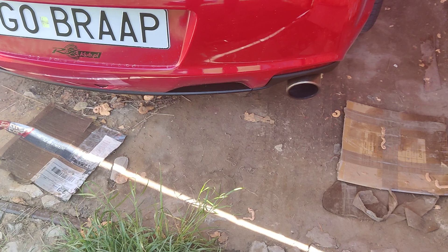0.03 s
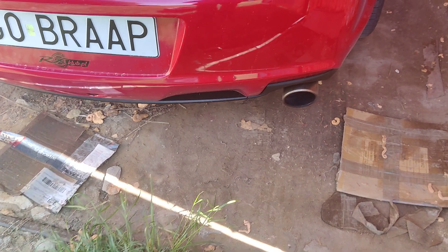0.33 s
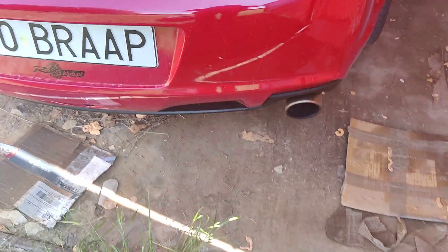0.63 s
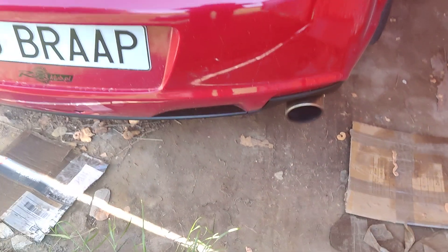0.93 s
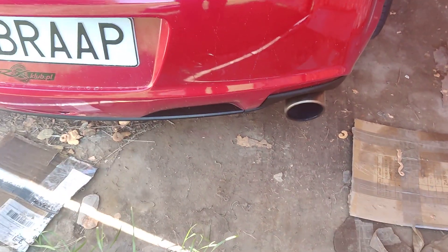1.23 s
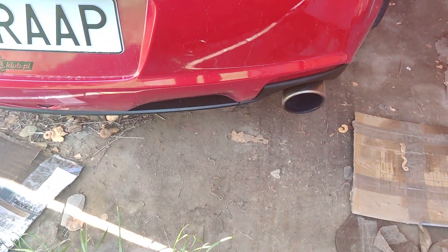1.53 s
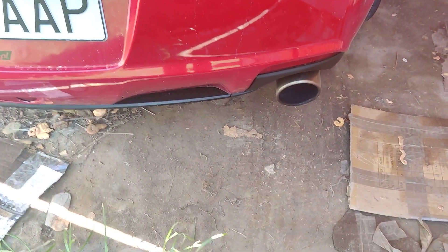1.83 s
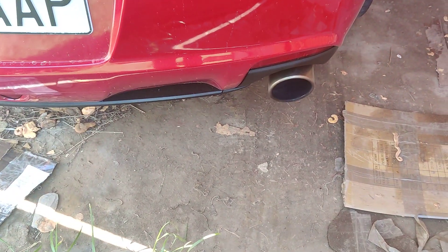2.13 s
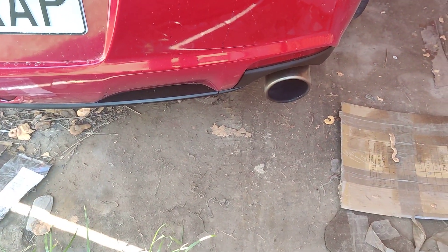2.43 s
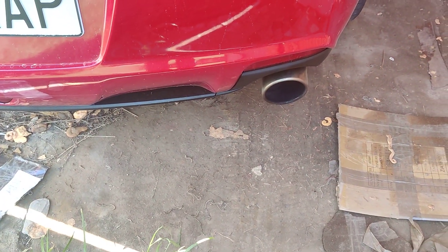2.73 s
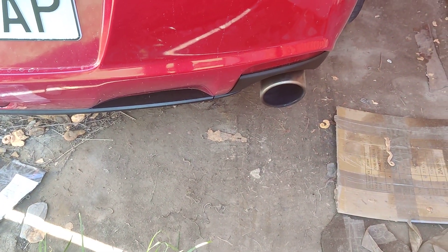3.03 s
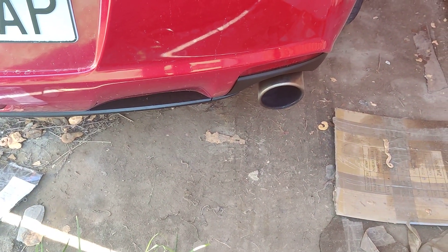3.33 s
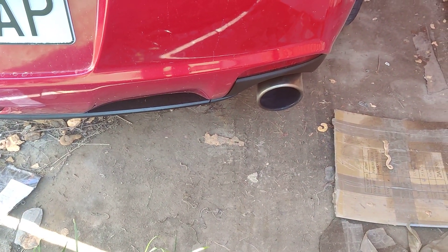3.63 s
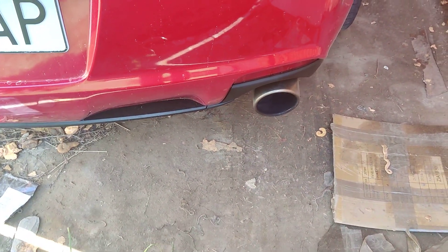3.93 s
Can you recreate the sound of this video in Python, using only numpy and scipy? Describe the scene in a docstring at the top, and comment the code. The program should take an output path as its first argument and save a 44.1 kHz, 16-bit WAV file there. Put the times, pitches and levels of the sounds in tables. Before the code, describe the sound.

A parked car idles outdoors, its deep exhaust rumble throbbing evenly close to the microphone. Small clicks and scuffs come as the sound fades in, and a soft hiss, light ticking and a faint, thin whistle sit behind it.

```python
"""A six-cylinder car idles at about 890 rpm over concrete, heard from just behind the tailpipe.
The sound fades in, with a few small clicks and scuffs in the first second. From then on each firing
thumps through the silencer and rings the pipe, and unequal cylinders make the rumble throb.
Gas hisses, the valve gear ticks lightly and a thin whistle comes and goes, weaker after two seconds.
Near the end there is a faint squeak."""
import sys
import numpy as np
from scipy import signal
from scipy.fft import rfft, irfft
from scipy.io import wavfile
from scipy.ndimage import uniform_filter1d

SR = 44100
rng = np.random.default_rng(int(sys.argv[2]) if len(sys.argv) > 2 else 0)


def generate_wav(signal):
    """Clip the signal to [-1, 1] and save it as 16-bit WAV at the path in sys.argv[1]."""
    frames = np.transpose(np.atleast_2d(signal))
    scaled = np.clip(frames, -1, 1) * 32767
    pcm = np.round(scaled).astype(np.int16)
    wavfile.write(sys.argv[1], SR, pcm)


N = 176400
T = np.arange(N) / SR


def amp(db):
    """Amplitude ratio of a level in decibels."""
    return 10 ** (np.asarray(db) / 20)


def unit(x):
    """Normalisation to rms 1."""
    return x / np.sqrt(np.mean(x ** 2) + 1e-20)


def curve(rows, column=1):
    """Linear interpolation of a time table at every sample."""
    rows = np.array(rows)
    return np.interp(T, rows[:, 0], rows[:, column])


def at_hz(rows, hz):
    """Interpolation of a table on a log-frequency axis."""
    f, value = np.transpose(rows)
    return np.interp(np.log(hz + 1e-3), np.log(f), value)


def add(mix, start_s, sound):
    """Superposition of a sound on the mix."""
    part = mix[round(start_s * SR):][:len(sound)]
    part += sound[:len(part)]


def colour(x, rows, size=32768):
    """Minimum-phase filtering: a causal response with the given gains."""
    log_gain = np.log(amp(at_hz(rows, abs(np.fft.fftfreq(size, 1 / SR)))))
    response = np.fft.ifft(np.exp(np.conj(signal.hilbert(log_gain)))).real
    return signal.fftconvolve(x, response[:size // 2])[:N]


def wander(rate_hz):
    """Low-pass Gaussian noise of rms 1."""
    hz = np.fft.rfftfreq(N, 1 / SR)
    return unit(irfft(rfft(rng.standard_normal(N)) * np.exp(-(hz / rate_hz) ** 2), N))


def ring(x, modes, size=4096):
    """Modal response at rms 1: each mode is a damped sinusoid whose bandwidth sets its decay."""
    t = np.arange(size) / SR
    response = sum(amp(db) * width * np.exp(-np.pi * width * t) * np.sin(2 * np.pi * hz * t)
                   for hz, width, db in modes)
    return unit(signal.fftconvolve(x, response)[:N])


def pulses(times, sizes):
    """Impulse train, each impulse shared between its two nearest samples."""
    inside = (times >= 0) & (times < T[-2])
    place, sizes = times[inside] * SR, sizes[inside]
    i, part = place.astype(int), place % 1
    return np.bincount(i, sizes * (1 - part), N) + np.bincount(i + 1, sizes * part, N)


# glides of the squeak: start_s, length_s, start_hz, end_hz, level_db
SQUEAK_GLIDES = [(3.718, 0.062, 3840, 3910, -56), (3.768, 0.027, 3480, 3640, -56),
                 (3.78, 0.026, 3300, 2900, -56)]

def squeak():
    """Random amplitude modulation turns short gliding tones into a faint, raspy squeak."""
    out = np.zeros(N)
    for start_s, length_s, start_hz, end_hz, db in SQUEAK_GLIDES:
        progress = np.linspace(0, 1, int(length_s * SR))
        phase = 2 * np.pi * np.cumsum(start_hz + (end_hz - start_hz) * progress) / SR
        envelope = np.sqrt(abs(np.sin(np.pi * progress)))
        add(out, start_s, amp(db) * envelope * np.sin(phase))
    return out * (.5 + wander(rate_hz=260))


# impulses before filtering: start_s, level_db
CLICK_IMPULSES = [(.1375, -9), (.257, -1.5), (.3175, -18)]
# noise bursts before filtering: start_s, level_db, decay_s
SCUFF_BURSTS = [(.318, -52, .006), (.91, -52, .008), (.958, -51, .011)]
# filter for both: frequency_hz, gain_db
CLICK_RESPONSE = [(200, 3), (800, 1), (3000, -6), (7000, -14), (12000, -18), (15000, -23)]

def clicks_and_scuffs():
    """Broadband transients: filtered impulses sound as dry clicks, decaying noise as scuffs."""
    out = np.zeros(N)
    for start_s, db in CLICK_IMPULSES:
        add(out, start_s, amp([db]))
    t = np.arange(0, .1, 1 / SR)
    for start_s, db, decay_s in SCUFF_BURSTS:
        add(out, start_s, amp(db) * np.exp(-t / decay_s) * rng.standard_normal(len(t)))
    return colour(out, CLICK_RESPONSE)


# whistle at each ear: time_s, left_db, right_db
WHISTLE_LEVELS = [(0, -53, -82), (.3, -52, -82), (.45, -56.5, -89), (.62, -64, -69), (.82, -54.5, -63.5),
                  (1, -58, -98), (1.12, -66.5, -78), (1.22, -55.5, -79.5), (1.4, -94, -69.5),
                  (1.47, -58, -76), (1.6, -54.5, -101.5), (1.77, -52, -74), (1.88, -62.5, -74.5),
                  (2.3, -59, -78), (2.7, -64.5, -83), (3.7, -63.5, -76.5), (3.92, -67, -65.5)]

def whistle(pitch_hz=5805, drift_hz=6.5, width_hz=20, blur_rad=.8):
    """Line broadening: random amplitude and phase modulation make the engine's thin whistle waver."""
    phase = 2 * np.pi * np.cumsum(pitch_hz + drift_hz * wander(rate_hz=2.2)) / SR
    ears = []
    for column in (1, 2):
        flutter = 1 + .14 * wander(width_hz)
        tone = np.sin(phase + blur_rad * wander(width_hz))
        ears.append(flutter * tone * amp(curve(WHISTLE_LEVELS, column)))
    return np.array(ears)


# metallic resonances: pitch_hz, bandwidth_hz, gain_db
VALVE_MODES = [(1490, 88, 1), (2490, 160, -5.5), (3700, 60, -6.5), (4620, 140, -10.5)]

def valve_gear(times, ticks_per_firing=4, jitter_s=.0006, spread_db=8, level_db=-61):
    """Impact excitation: light, uneven ticks ring the modes of the valve gear."""
    tick_cycles = np.arange(ticks_per_firing * (len(times) - 1)) / ticks_per_firing
    tick_times = np.interp(tick_cycles, np.arange(len(times)), times)
    ears = [ring(pulses(tick_times + jitter_s * late, amp(spread_db * size)), VALVE_MODES)
            for late, size in rng.standard_normal((2, 2, len(tick_times)))]
    return amp(level_db) * np.array(ears)


# spectral density of the hiss: frequency_hz, relative_db
HISS_SPECTRUM = [(650, -21.5), (1100, 0), (1350, -13), (1590, -6), (1820, -11.5), (2550, -10),
                 (3240, -15.5), (3770, -13.5), (5460, -21.5), (5960, -20), (6220, -19), (7090, -29.5),
                 (11600, -35.5), (12500, -41), (14900, -53.5)]
# interaural level difference: frequency_hz, left_minus_right_db
HISS_BALANCE = [(1000, -2), (3500, -0.5), (4500, 1.5), (5400, 9.5), (6400, 5), (7200, 3.5), (14000, 1.5)]
# likeness of the two ears: frequency_hz, correlation
HISS_COHERENCE = [(500, 0.3), (1200, 0.017), (4000, .03), (8000, 0.19), (13000, 0.15)]

def hiss(times, level_db=-51.5, patchy_db=1, pulsing_depth=.061):
    """Partly coherent broadband noise of gas and engine, amplitude-modulated at the firing rate."""
    hz, _, noise = signal.stft(rng.standard_normal((2, N)), SR, nperseg=512)
    coherence = at_hz(HISS_COHERENCE, hz)[:, None]
    noise[1] = coherence * noise[0] + np.sqrt(1 - coherence ** 2) * noise[1]
    patches = uniform_filter1d(rng.standard_normal(noise.shape[1:]), size=6, axis=0)
    patches = unit(uniform_filter1d(patches, size=5, axis=1))  # smooth in frequency and time
    pan_db = np.array([.5, -.5])[:, None, None] * at_hz(HISS_BALANCE, hz)[:, None]
    gain = amp(at_hz(HISS_SPECTRUM, hz)[:, None] + pan_db + patchy_db * patches)
    steady = unit(signal.istft(noise * gain, nperseg=512)[1][:, :N])
    cycle = np.interp(T, times, np.arange(len(times)))
    return amp(level_db) * steady * (1 + pulsing_depth * np.cos(2 * np.pi * cycle))


# lower pipe resonances: pitch_hz, bandwidth_hz, gain_db
HOLLOW_MODES = [(459, 27, -12), (525.5, 55, -1), (533, 8.3, -3.5), (546.5, 22, 4), (594, 12, -9.5)]
# upper pipe resonances: pitch_hz, bandwidth_hz, gain_db
RASP_MODES = [(689, 3.3, 10.5), (766.3, 33, 4.5), (828, 25, -1), (847.5, 49, 0.5), (1000, 30, -16.5)]
# strength of each group: time_s, hollow_db, rasp_db
PIPE_LEVELS = [(0, -49.5, -48.5), (.8, -46, -46.5), (1.3, -48, -46), (1.7, -47, -46.5), (2.1, -45, -47.5),
               (3, -44.5, -47.5), (4, -45, -47.5)]

def tailpipe(times, extra, bank, bank_lag_s=.00055, hollow_lag_s=.003846, puff_s=.019, puff_share=.33):
    """Forced resonance: each firing and its turbulent puff, muffled by the silencer, ring the pipe."""
    arrivals = times + bank * bank_lag_s  # every second firing takes a longer path
    strengths = np.maximum(1 + .96 * extra, 0)
    silencer = signal.butter(4, 1150, fs=SR, output="sos")

    def drive(lag_s):
        kicks = pulses(arrivals + lag_s, strengths)
        puff_envelope = signal.lfilter([1], [1, -np.exp(-1 / (puff_s * SR))], kicks)
        puffs = unit(puff_envelope * rng.standard_normal(N))
        shared = np.sqrt(1 - puff_share) * unit(kicks) + np.sqrt(puff_share) * puffs
        turbulence = .45 * rng.standard_normal((2, N))  # independent at each ear
        return signal.sosfilt(silencer, shared + turbulence)

    hollow = np.array([ring(ear, HOLLOW_MODES) for ear in drive(hollow_lag_s)])
    rasp = np.array([ring(ear, RASP_MODES) for ear in drive(0)])
    return hollow * amp(curve(PIPE_LEVELS, 1)) + rasp * amp(curve(PIPE_LEVELS, 2))


# filter for the throb: frequency_hz, relative_db
THROB_RESPONSE = [(8, -31), (15, -8), (22, 0.5), (30, 0.5), (38, 10.5), (55, -12.5), (78, -18.5), (103, -2),
                  (125, -6), (152, -2.5), (178, -3.5), (205, -26), (250, -20.5), (315, -8), (370, -26),
                  (600, -66.5), (2000, -125)]

def throb(times, extra, level_db=-26.5):
    """Subharmonics: unequal cylinders add tones below and between the firing harmonics."""
    return unit(colour(pulses(times, extra), THROB_RESPONSE)) * amp(level_db)


# filter for the pipe's drone: frequency_hz, relative_db
DRONE_RESPONSE = [(40, -32), (88.8, -10), (133, -6), (178, 1.5), (222, -21.5), (266, -18), (311, -14.5),
                  (355, -33), (400, -41), (600, -73.5), (2000, -130)]
# drone before its bass is shaped: time_s, level_db
DRONE_ENVELOPE = [(0, -19.5), (.5, -16.5), (1, -16), (1.7, -15.5), (2.6, -16), (4, -16.5)]
# its bass, fuller close to the pipe: time_s, gain_db
BASS_GAIN = [(0, -4), (.7, -2.5), (1.3, -1), (2, 1), (4, 2.6)]

def drone(times, bass_hz=152):
    """Harmonic series: the pipe filters the periodic firings into a low drone."""
    harmonics = unit(colour(pulses(times, np.ones(len(times))), DRONE_RESPONSE))
    harmonics *= amp(curve(DRONE_ENVELOPE))
    bass = signal.sosfiltfilt(signal.butter(6, bass_hz, fs=SR, output="sos"), harmonics)
    return harmonics + bass * (amp(curve(BASS_GAIN)) - 1)


# filter for the silencer's thump: frequency_hz, relative_db
THUMP_RESPONSE = [(8, -42.5), (25, -22), (44.4, 1), (90, -35.5), (300, -72), (2000, -140)]
# strength of the thump: time_s, level_db
THUMP_ENVELOPE = [(0, -20), (.2, -30.5), (.26, -18), (.6, -15), (1, -15.5), (1.7, -14.5), (2.6, -14),
                  (4, -14.5)]

def thump(times, lead_s=.0015):
    """Acoustic filtering: the silencer passes the firing fundamental as a deep thump."""
    kicks = pulses(times - lead_s, np.ones(len(times)))
    return unit(colour(kicks, THUMP_RESPONSE)) * amp(curve(THUMP_ENVELOPE))


# interaural level difference: frequency_hz, left_minus_right_db
RUMBLE_BALANCE = [(44, .2), (90, .3), (133, .9), (178, 1.5), (266, -.5), (311, -.8)]
# interaural phase difference: frequency_hz, left_lead_rad
RUMBLE_LEAD = [(44, .01), (100, .02), (178, -0.14), (266, 0.098), (311, 0.17)]

def rumble(times, extra, ramp_s=.004):
    """Superposition of thump, drone and throb, placed by interaural level and phase."""
    low = thump(times) + drone(times) + throb(times, extra)
    ramps = np.minimum(1, np.minimum(T, T[::-1]) / ramp_s)
    hz = np.fft.rfftfreq(N, 1 / SR)
    side = np.array([[.5], [-.5]])
    ears = amp(side * at_hz(RUMBLE_BALANCE, hz)) * np.exp(1j * side * at_hz(RUMBLE_LEAD, hz))
    return irfft(rfft((low - low.mean()) * ramps) * ears, N)


# idle speed: time_s, firing_rate_hz
FIRING_RATE = [(0, 44.6), (.6, 44.56), (.85, 44.42), (1.3, 44.55), (2, 44.43), (2.8, 44.33), (4, 44.35)]
# cylinders in firing order: extra_strength_share
CYLINDER_IMBALANCE = [-0.005, -.05, 0.11, -0.26, 0.061, -0.0081]

def firings(first_cylinder_at_s=1.5794, jitter_s=.000045, scatter=.065):
    """Quasi-periodic excitation: the time, extra strength and cylinder bank of each firing."""
    cycles = np.cumsum(curve(FIRING_RATE)) / SR
    cycles -= np.interp(first_cylinder_at_s, T, cycles)
    number = np.arange(np.ceil(cycles[0]), cycles[-1]).astype(int)
    late, stronger = rng.standard_normal((len(number), 2)).T
    times = np.interp(number, cycles, T) + jitter_s * late
    extra = np.array(CYLINDER_IMBALANCE)[number % len(CYLINDER_IMBALANCE)] + scatter * stronger
    return times, extra, number % 2


def scene():
    """Superposition of all sources; one firing sequence times the exhaust, hiss and valve gear."""
    times, extra, bank = firings()
    exhaust = rumble(times, extra) + tailpipe(times, extra, bank)
    return exhaust + hiss(times) + valve_gear(times) + whistle() + clicks_and_scuffs() + squeak()


# opening fade: time_s, gain_db
FADE_IN = [(0, -72), (.074, -76), (.08, -22), (.11, -16), (.17, -10.5), (.222, -9.5), (.234, -6.5),
           (.32, -1.5), (.55, -2.5), (.8, 0), (4, -0.5)]

def record(dry, cutoff_hz=15200):
    """A gain envelope fades the sound in; a linear-phase low-pass limits its band."""
    low_pass = signal.firwin(511, cutoff_hz, window=("kaiser", 9), fs=SR)
    return signal.oaconvolve(dry * amp(curve(FADE_IN)), low_pass[None], "same")


dry = scene()
out = record(dry)
generate_wav(out)
```